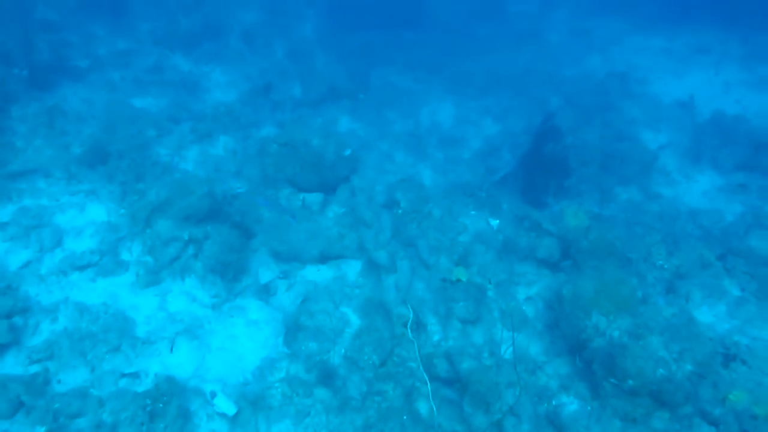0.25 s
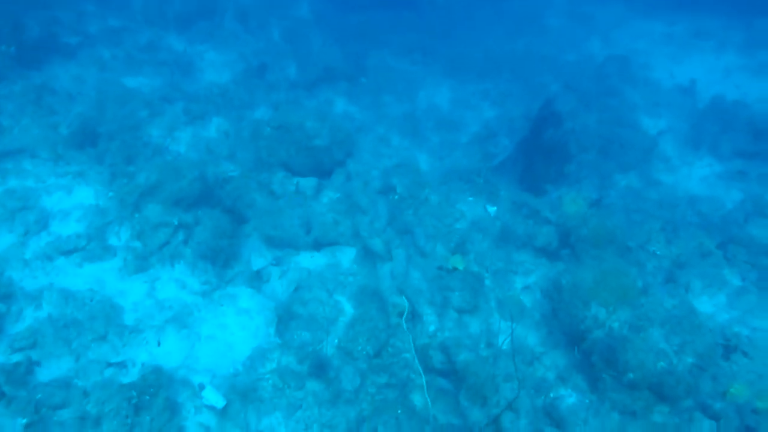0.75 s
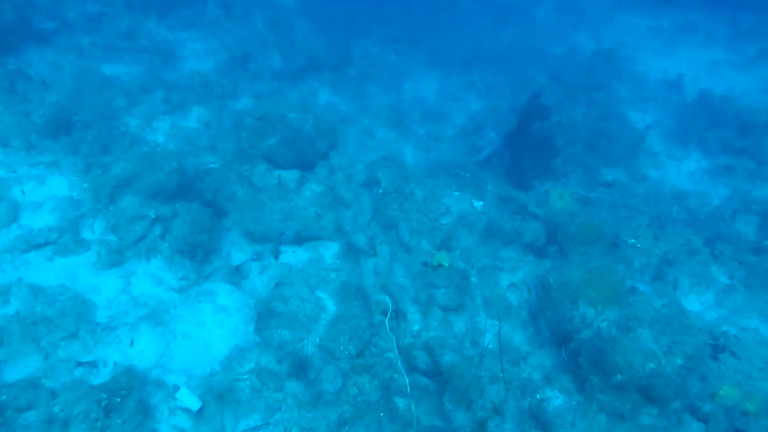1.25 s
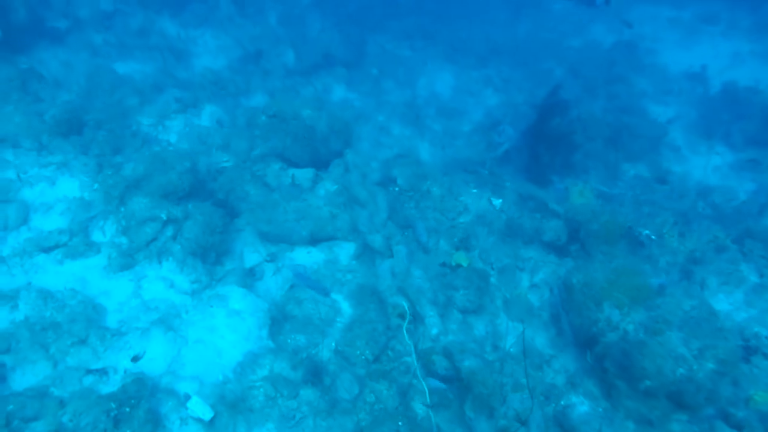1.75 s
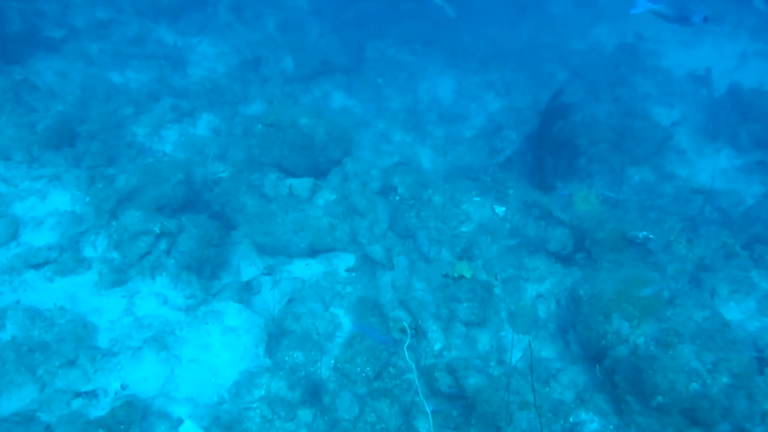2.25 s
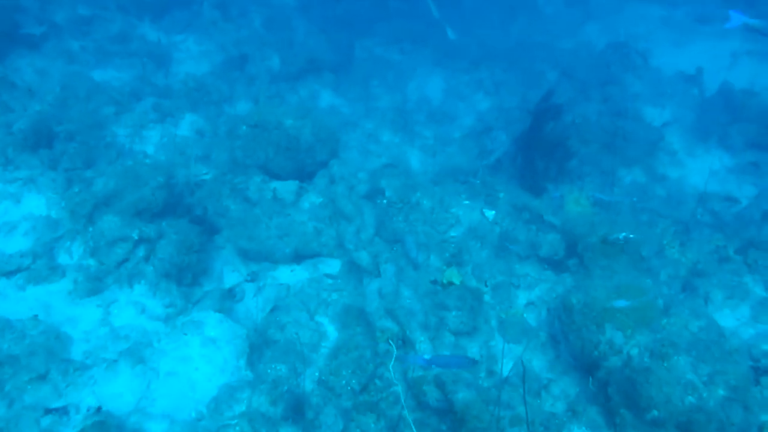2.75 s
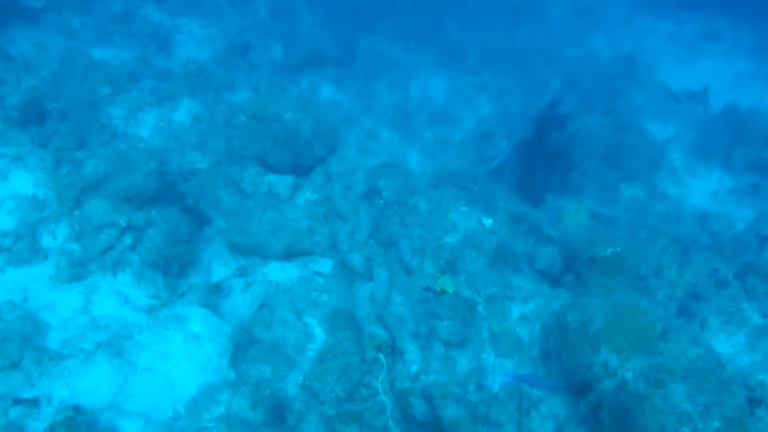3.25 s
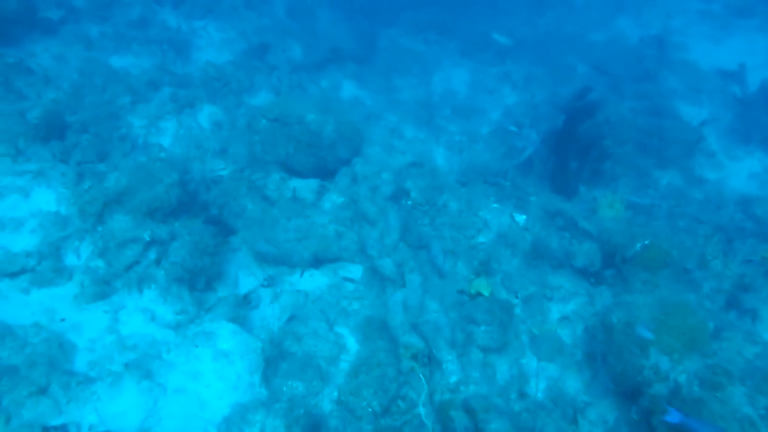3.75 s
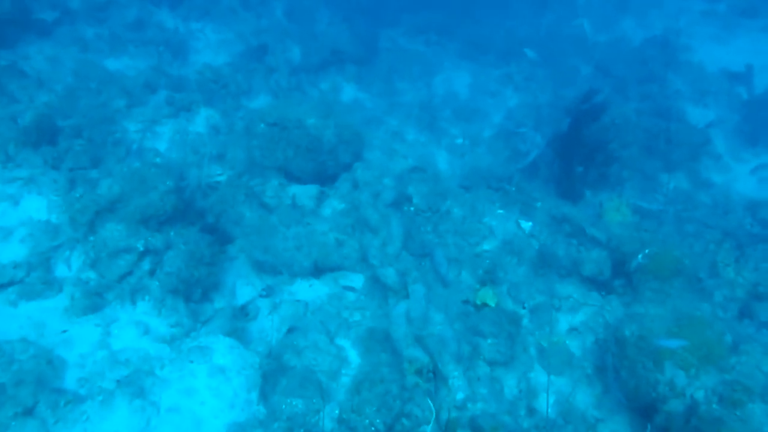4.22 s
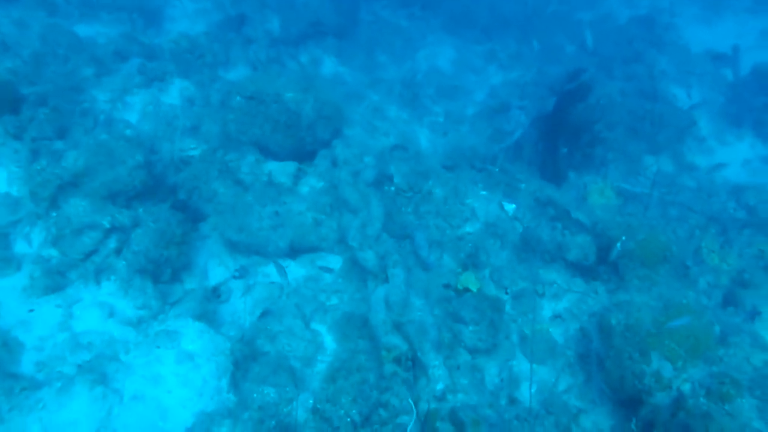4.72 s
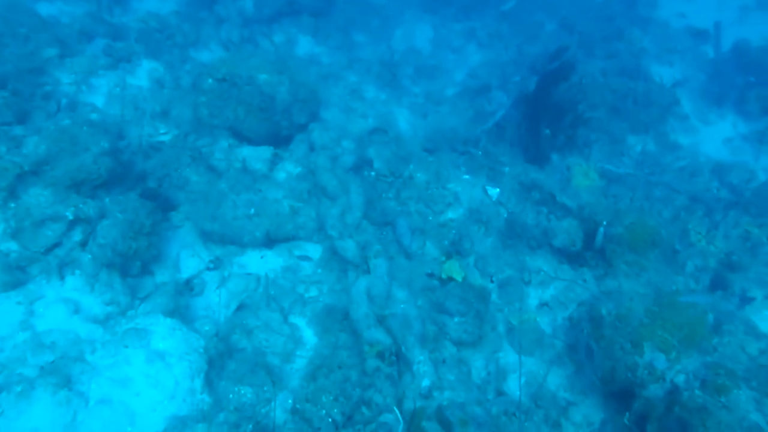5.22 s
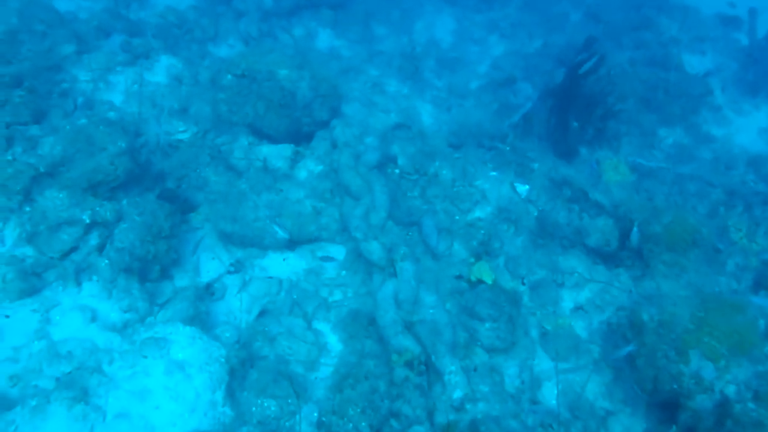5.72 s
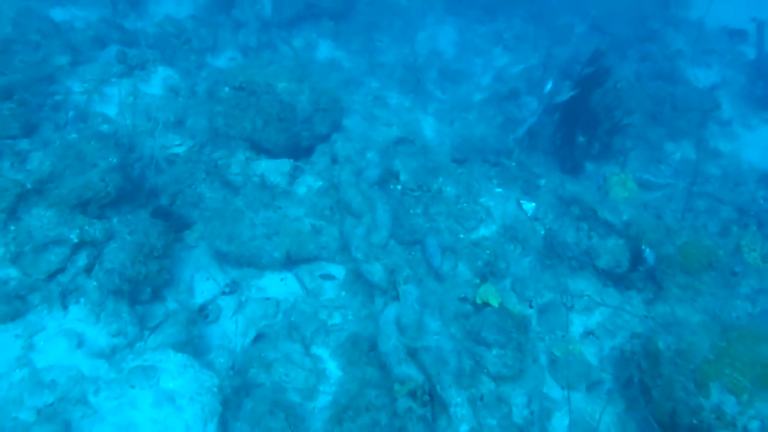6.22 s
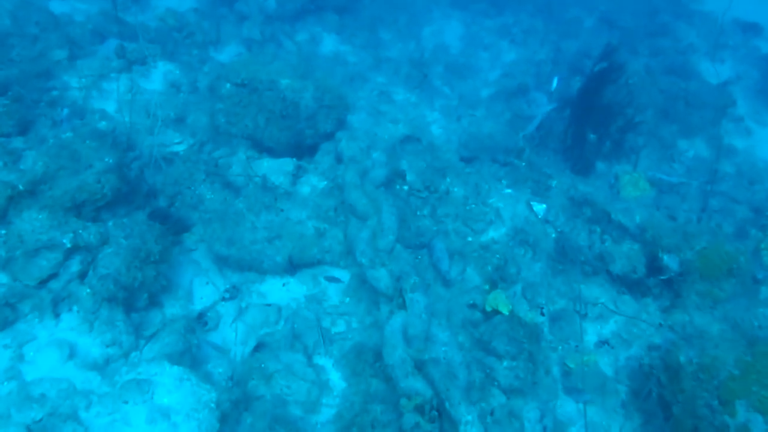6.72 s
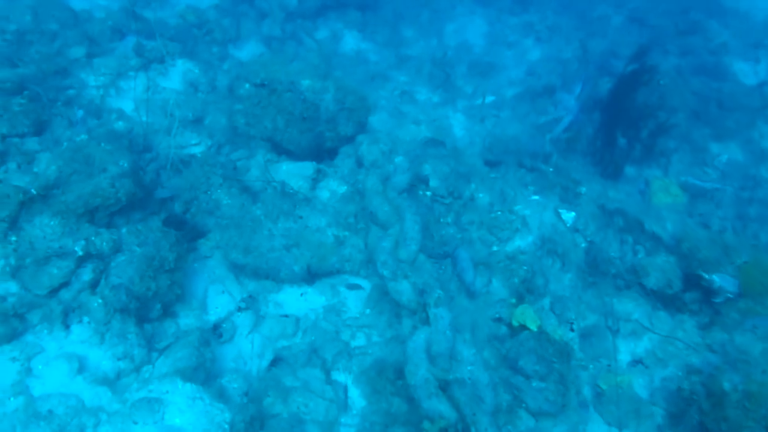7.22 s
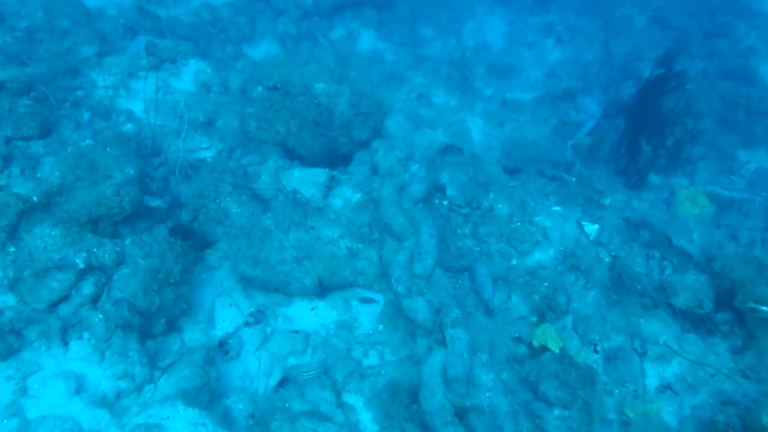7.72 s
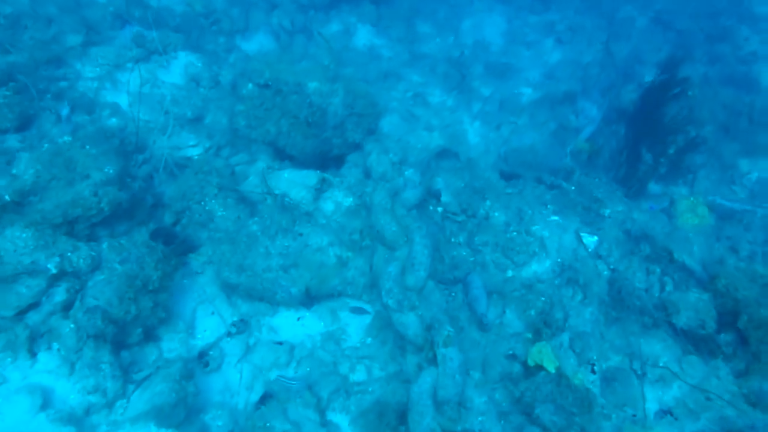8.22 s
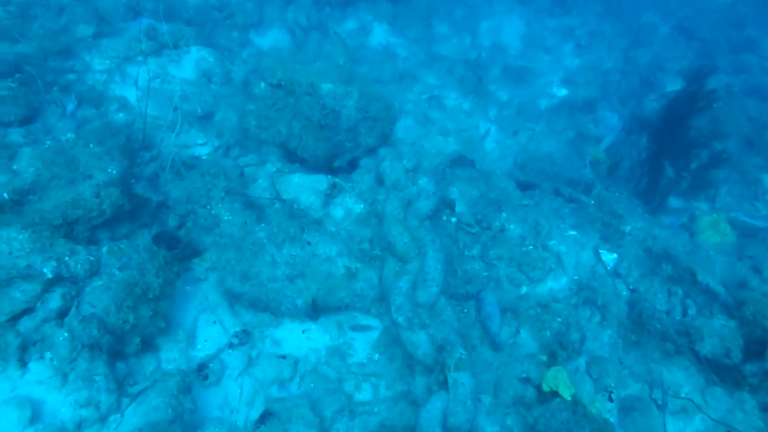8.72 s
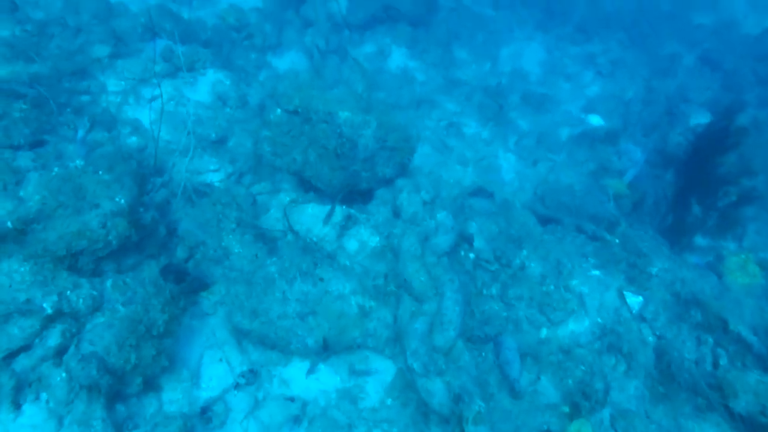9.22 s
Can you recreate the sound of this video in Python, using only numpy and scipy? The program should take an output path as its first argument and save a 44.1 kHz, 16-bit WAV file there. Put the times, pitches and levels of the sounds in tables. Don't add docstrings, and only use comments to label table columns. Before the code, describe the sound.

A muffled, rattling engine hum carries through shallow water over a reef, with gurgling wash, faint fizz, and occasional soft thuds against the camera.

```python
import sys
import numpy as np
from scipy import signal
from scipy.fft import rfft, irfft
from scipy.io import wavfile
from scipy.ndimage import uniform_filter1d, map_coordinates

SR = 44100
rng = np.random.default_rng(int(sys.argv[2]) if len(sys.argv) > 2 else 0)


def put_to_file(sound):
    columns = np.atleast_2d(sound).T
    safe = np.clip(columns, -1, 1)
    whole_steps = np.round(safe * 32767)
    wavfile.write(sys.argv[1], SR, whole_steps.astype(np.int16))


def level_to_linear(level):
    exponent = np.asarray(level, float) / 20
    return 10 ** exponent


N = 417627
SPAN_S = 10
CYCLE_HZ, PUMP_HZ = 15.0, 177.34


def wobble(rate_hz):
    knots = rng.standard_normal(int(N * rate_hz / SR) + 4)
    return map_coordinates(knots, [np.arange(N) * rate_hz / SR])


def tones(hz, db, turns, unsteady_db, blur_hz):
    spectrum = np.zeros(SPAN_S * SR // 2 + 1, complex)
    near = np.arange(-6 * SPAN_S, 6 * SPAN_S + 1)
    shape = np.exp(-(near / SPAN_S / blur_hz) ** 2)
    for f, level, turn, waver_db in zip(hz, db, turns, np.broadcast_to(unsteady_db, len(hz))):
        skirt = shape * (rng.standard_normal(len(near)) + 1j * rng.standard_normal(len(near)))
        skirt *= level_to_linear(waver_db) / np.linalg.norm(skirt)
        skirt[len(near) // 2] += np.exp(2j * np.pi * turn)
        spectrum[round(f * SPAN_S) + near] += level_to_linear(level) * skirt
    return irfft(spectrum)[:N] * SPAN_S * SR / np.sqrt(2)


def rush(points, patchy_db):
    z = signal.stft(rng.standard_normal(SPAN_S * SR), nperseg=512)[2]
    patches = uniform_filter1d(rng.standard_normal(z.shape), 4, 0)
    patches = uniform_filter1d(patches, 20, 1)
    z = z * level_to_linear(patchy_db * patches / patches.std())
    white = signal.istft(z, nperseg=512)[1][:SPAN_S * SR]
    hz = np.fft.rfftfreq(SPAN_S * SR, 1 / SR)
    f, db = np.transpose(points)
    gain = level_to_linear(np.interp(np.log(hz + 1), np.log(f + 1), db, left=-200, right=-200))
    return irfft(rfft(white / white.std()) * gain)[:N] * np.sqrt(SR / 2)


# [order, level/dB rms]
ENGINE_ORDERS = [(1, -72.8), (2, -63.6), (3, -49.6), (4, -43.3), (5, -44.2), (6, -48.6), (7, -39.3),
                 (8, -39.8), (9, -36.1), (10, -44.3), (11, -35.2), (12, -33.4), (13, -50.8), (14, -47.5),
                 (15, -52.6), (16, -45.0), (17, -47.5), (18, -50.1), (19, -54.1), (20, -48.2), (21, -50.5),
                 (22, -49.3), (23, -51.3), (25, -49.0), (26, -46.9), (27, -50.9), (28, -53.3), (29, -58.0),
                 (30, -43.0), (31, -50.8), (32, -50.8), (33, -41.2), (34, -40.7), (35, -48.2), (36, -41.7),
                 (37, -33.7), (38, -43.0), (39, -39.8), (40, -38.6), (41, -34.7), (42, -42.0), (43, -41.0),
                 (44, -44.9), (45, -53.0), (48, -59.5), (49, -51.0), (50, -57.1), (51, -64.6), (52, -64.9)]
# [f/Hz, arrival/cycles]
ARRIVAL_DELAY = [(52, 0.305), (68, 0.292), (110, 0.555), (136, 0.742), (163, 0.702), (184, 1.231),
                 (229, 0.921), (457, 1.498), (517, 1.214), (549, 1.422), (574, 1.196), (601, 1.503),
                 (636, 1.598), (671, 1.362)]


def engine():
    order, db = np.transpose(ENGINE_ORDERS)
    weak = np.arange(53, 85)
    order = np.append(order, weak).astype(int)
    db = np.append(db, -67 + 1.5 * rng.standard_normal(len(weak)))
    between_hz = (np.arange(order[-1] + 1) - .5) * CYCLE_HZ
    lag = np.cumsum(np.interp(between_hz, *np.transpose(ARRIVAL_DELAY))) - .2
    hz, turns = order * CYCLE_HZ, -lag[order]
    low = order < 14
    steady = tones(hz[low], db[low], turns[low], unsteady_db=-16, blur_hz=1.5)
    loose = tones(hz[~low], db[~low] - .6, turns[~low], unsteady_db=-9.5, blur_hz=1.6)
    return steady + loose


# [order, level/dB rms]
VANE_ORDERS = [(2, -36.3), (3, -46.1), (4, -43.8), (5, -61.0), (6, -50.2), (7, -61.1), (8, -57.9),
               (9, -66.6), (10, -65.4), (11, -61.8), (12, -60.3), (13, -63.4), (14, -68.1), (15, -65.4),
               (16, -65.0), (17, -62.7), (18, -67.4), (19, -68.5), (20, -68.5), (21, -67.3), (22, -74.4),
               (23, -67.8), (24, -76.9)]


def pump():
    order, db = np.transpose(VANE_ORDERS)
    waver_db = -11 + .3 * order
    return tones(order * PUMP_HZ, db - .4, rng.random(len(db)), unsteady_db=waver_db, blur_hz=1.4)


# [f/Hz, level/dB rms]
GEAR_TONES = [(248.3, -49.5), (258.4, -52.5), (266.5, -49), (294.7, -51), (358, -55), (488, -46.5),
              (490.6, -51.5), (496.6, -39.5), (537, -53.5), (697.1, -49.5), (705, -47.5), (870, -65),
              (895, -56), (980.4, -64), (1074, -55), (1125, -61), (1185, -60.5), (1432, -58), (1695.1, -60),
              (2152, -69), (4982.2, -76.5), (5012.5, -73.5), (7852.2, -87), (7881.8, -96)]


def gears():
    hz, db = np.transpose(GEAR_TONES)
    return tones(hz, db - 2.3, rng.random(len(db)), unsteady_db=-8, blur_hz=1.7)


# [f/Hz, level/dB per Hz]
HULL_ROAR = [(12, -93.5), (30, -84), (60, -71), (103, -66.5), (192, -63.5), (251, -57.5), (333, -64),
             (360, -58), (421, -66.5), (495, -59), (555, -60), (605, -55.5), (779, -74.5), (849, -80)]


def hull():
    return rush(HULL_ROAR, patchy_db=1.2)


# [t/s, cavity ring level/dB, low surge level/dB]
CHURN_LEVELS = [(0, -28, -32), (.5, -18, -30.5), (1, -21.5, -29.5), (1.5, -16.5, -31),
                (1.999, -24.5, -26.5), (2.5, -18, -25.5), (3, -19.5, -23), (3.5, -20, -33),
                (3.999, -21.5, -36), (4.5, -32, -33), (5.3, -38, -32.5), (6.2, -32.5, -30.5),
                (7.5, -29, -32.5), (8.5, -40.5, -32.5), (9.47, -34, -35)]


def churn():
    s, ring_db, surge_db = np.transpose(CHURN_LEVELS)
    t = np.arange(N) / SR
    ring = rush([(500, -72), (575, -57.5), (605, -54.5), (670, -67.5)], patchy_db=-1.3)
    surge = rush([(60, -78), (130, -66), (250, -66.5), (320, -78)], patchy_db=-0.5)
    ring *= level_to_linear(np.interp(t, s, ring_db) + 27)
    surge *= level_to_linear(np.interp(t, s, surge_db) + 29.5)
    return ring + surge


def shaft_turn():
    return np.cos(2 * np.pi * (2 * CYCLE_HZ * np.arange(N) / SR + 0.28))


# [f/Hz, level/dB per Hz]
WASH_BAND = [(850, -79.5), (1073, -69.5), (1184, -75.5), (1266, -71), (1350, -78), (1435, -71.5),
             (1560, -80), (1734, -85.5), (1872, -73.5), (2084, -83), (2224, -79), (2351, -90), (2746, -84),
             (2999, -86.5)]


def wash():
    return level_to_linear(0.44 * wobble(1.8) + .3 * shaft_turn()) * rush(WASH_BAND, patchy_db=0.64)


# [f/Hz, level/dB per Hz]
FIZZ_BAND = [(3001, -84), (3240, -87), (3648, -77.5), (4085, -86.5), (4446, -93.5), (4594, -87.5),
             (4878, -92), (5166, -86.5), (5442, -99.9), (6057, -91), (6519, -108.1), (7249, -118.0)]


def fizz():
    return level_to_linear(.3 * wobble(2.6) + .6 * shaft_turn()) * rush(FIZZ_BAND, patchy_db=.7)


# [t/s, peak level/dB, f/Hz, t60/s]
CONTACTS = [(1.0774, -7, 240, .035), (1.0828, -13, 440, .045), (1.8415, -16, 135, .05),
            (2.62, -24, 150, .1), (2.9558, -32, 1200, .03), (2.9558, -36, 1750, .02), (5.08, -27, 85, .1),
            (6.589, -33, 1220, .03), (6.589, -37, 1650, .025), (7.5324, -62, 8500, .004),
            (7.72, -21, 90, .09), (9.42, -22, 130, .06)]


def bumps():
    out, t = np.zeros(N + SR), np.arange(SR // 4) / SR
    for s, db, hz, t60 in CONTACTS:
        onset = 1 - np.exp(-t * hz * 1.1)
        swing = np.sin(2 * np.pi * hz * t) * onset
        out[round(s * SR):][:len(t)] += level_to_linear(db + 3.5 - 60 * t / t60) * swing
    return out[:N]


def scene():
    machinery = engine() + pump() + gears() + hull()
    water = churn() + wash() + fizz()
    return (machinery + water + bumps())[None]


# [f/Hz, level/dB per Hz]
CIRCUIT_HISS = [(7251, -120), (7878, -115.5), (9708, -119.5), (10839, -116.5), (11140, -120), (13298, -122),
                (14200, -126)]


def circuit():
    return rush(CIRCUIT_HISS, patchy_db=-2.3)


def band_limit(x):
    return signal.sosfilt(signal.butter(12, 14170, fs=SR, output="sos"), x)


def record(dry):
    return band_limit(dry + circuit())


dry = scene()
out = record(dry)
put_to_file(out)
```